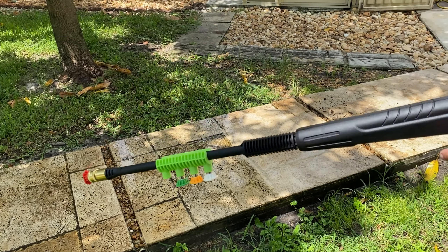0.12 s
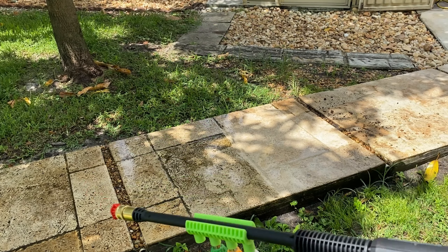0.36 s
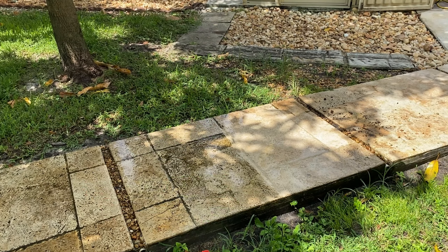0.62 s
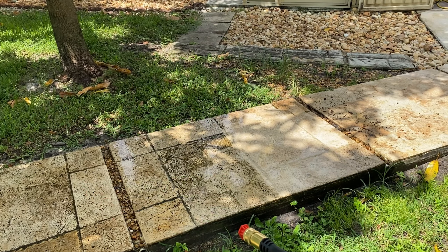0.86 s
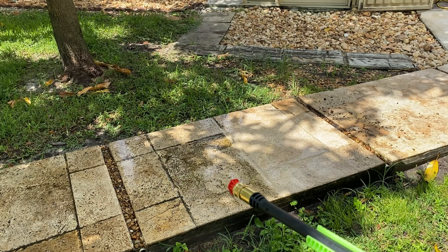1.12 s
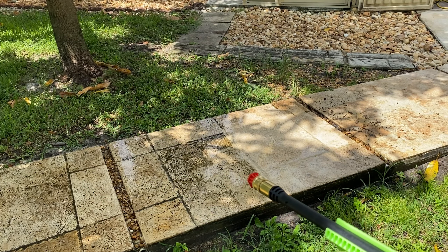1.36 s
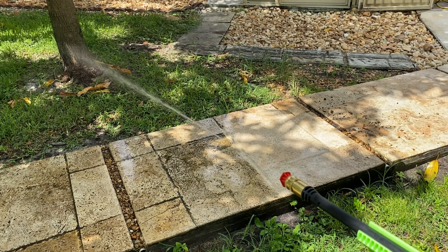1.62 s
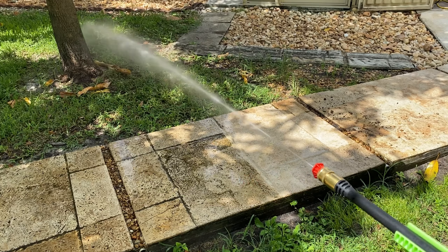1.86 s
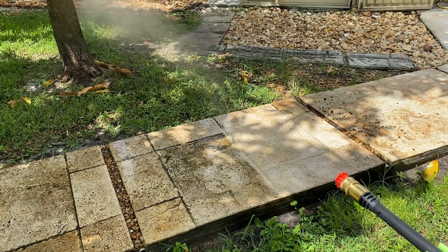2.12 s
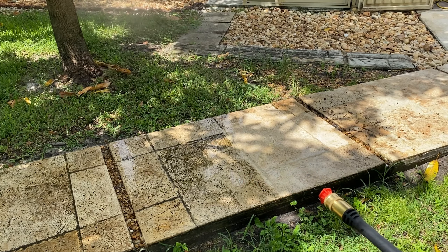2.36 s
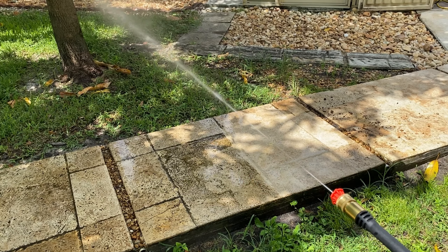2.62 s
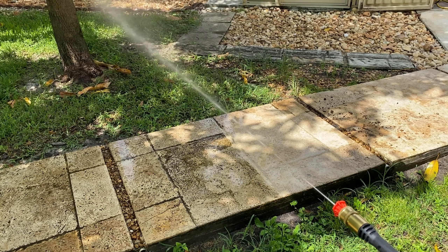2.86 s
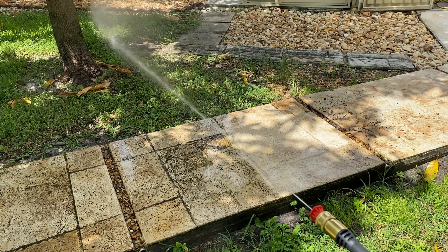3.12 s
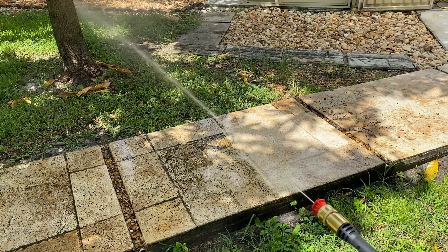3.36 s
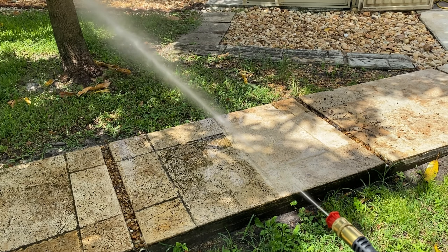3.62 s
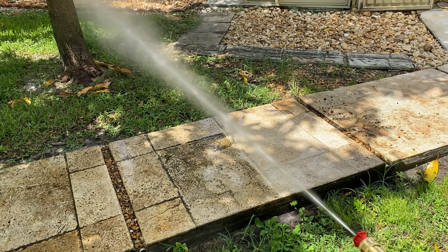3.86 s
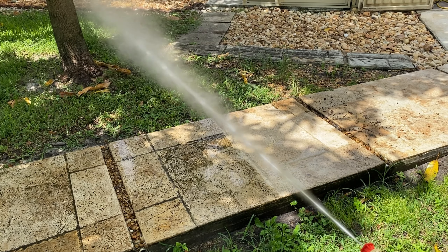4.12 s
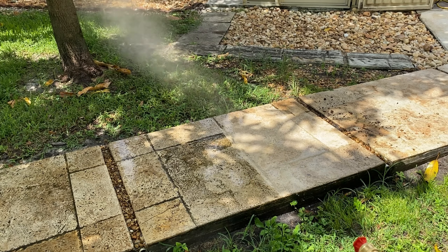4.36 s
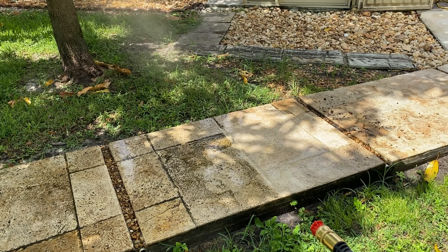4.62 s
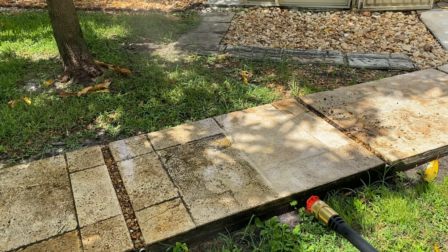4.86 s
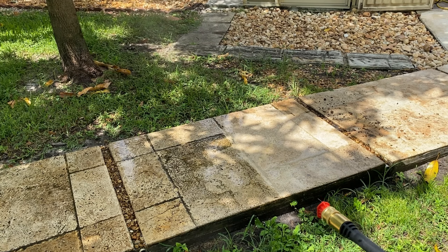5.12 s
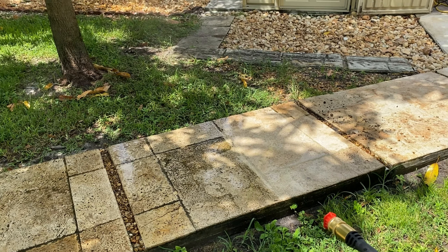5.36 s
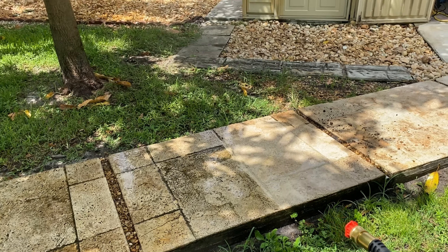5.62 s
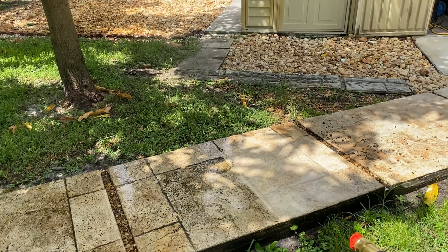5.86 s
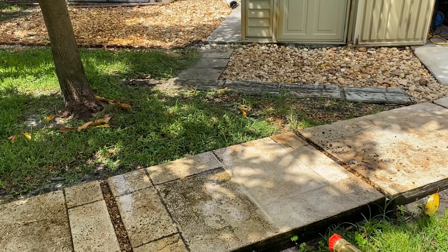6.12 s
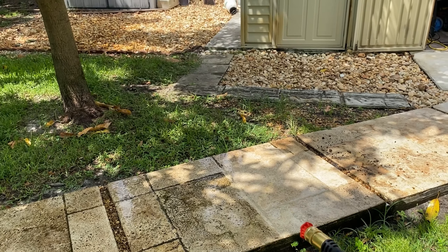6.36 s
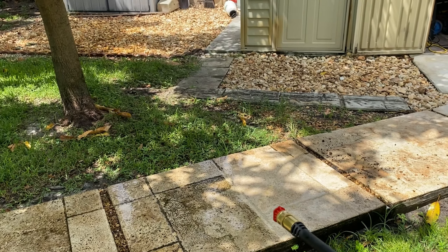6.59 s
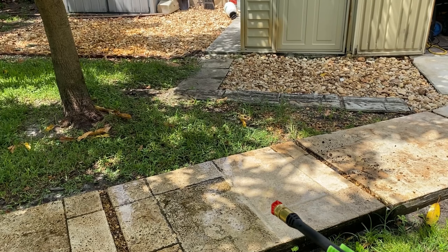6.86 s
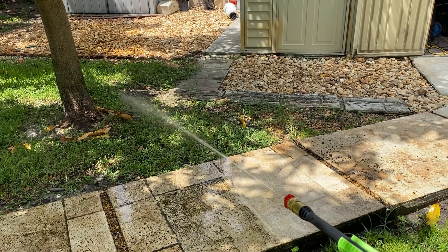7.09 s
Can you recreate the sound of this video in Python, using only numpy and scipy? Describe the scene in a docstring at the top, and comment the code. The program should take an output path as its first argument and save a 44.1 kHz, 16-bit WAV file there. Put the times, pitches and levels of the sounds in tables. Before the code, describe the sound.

Outdoors, close phone pickup with faint traffic, leaves and hum. From 0 to 0.25 s small plastic clicks and cloth rustle, a brief dry creak at 0.25, more ticks and swishes until 0.95, then a very faint far chirp near 1.0. At 1.5 a click starts thin bright water hiss, growing as a motor whine spins up, sounding filtered and lacking lows. Around 2.1 the hiss dips; a hard snap at 2.35 follows a short spurt. Hiss resumes at 2.43 while the whine sinks, then the motor surges again at 3.3, hiss fuller and strongest near 4.2. It cuts at 4.3, with a last spurt, snap and gust thump at 4.47. The whine slides steadily down to the end, with a thin falling whistle 4.6-5.4, dull knocks 5.4-6.5 and wind buffets. At 6.98 a click brings hiss back, again thinned of lows.

```python
"""Electric pressure washer in a yard, heard by a phone: the motor whines up and coasts down twice.
Its tones follow a computed speed; noise rings the casing. Coloured noise makes jet hiss and rustle.
Damped resonances make trigger clicks, knocks and a creak; a whistle glides as pressure bleeds off.
Low noise buffets the microphone ports; a wind filter slides its low cut up and down.
Behind: a distant mains hum, a far bird, traffic and leaves."""
import sys
import numpy as np
from scipy import signal
from scipy.fft import rfft, irfft, next_fast_len
from scipy.io import wavfile
from scipy.ndimage import uniform_filter1d

SR = 44100
rng = np.random.default_rng(int(sys.argv[2]) if len(sys.argv) > 2 else 0)


def rack_gain(trim_db):
    """Turn a fader trim in dB into the linear factor to multiply a signal by."""
    fader = np.asarray(trim_db, float)
    return 10 ** (fader / 20)


def to_wav(sig):
    """Store sig (one row per channel, or 1-D mono) as 16-bit WAV at the path in sys.argv[1].

    Samples outside -1..1 are clipped; the rate is SR.
    """
    pcm = np.clip(np.atleast_2d(sig), -1, 1) * 32767
    pcm = np.round(pcm).astype(np.int16)
    wavfile.write(sys.argv[1], SR, pcm.T)  # frames by channels


N = 318843

# motor runs: switch-on t/s, trigger let go t/s, start below full loudness/dB
RUNS = [(1.52, 2.089, 36), (3.28, 4.259, 0)]
# motor tones: multiple of whine, level/dB, wobble share at full speed, power of speed by which it fades
WHINE_TONES = [(1, -4, .012, 0), (1.158, -7, .007, 3.0), (2, -21, .01, -.3), (3, -20, .012, 0),
               (4, -17, .003, 8.0), (5, -22, .012, -.2)]
# loudness of all tones over whine pitch: f/Hz, level/dB
WHINE_LEVEL = [(300, -110), (560, -54), (740, -38.5), (1000, -42), (1400, -50), (1850, -53), (2350, -46),
               (2800, -44), (3300, -38.5), (3550, -40)]
# harmonics of the plunger beat: order, level/dB
PUMP_HARMONICS = [(1, -19), (2, -0.5), (3, 0.5), (4, -8.5), (5, -8), (6, -6), (8, -10.5)]
# spectrum of motor air: f/Hz, relative level/dB
MOTOR_AIR = [(60, -6), (300, -3), (900, -10.5), (2000, -9.5), (3500, -5.5), (5000, -10), (7000, -17.5),
             (11000, -20), (16000, -20)]
# casing resonances: f/Hz, width/Hz (t60 = 2.54 s / width), level re air/dB
CASING_MODES = [(905, 77, -8), (2890, 19, -11.5), (3440, 31, -22.5), (3850, 46, -11), (4800, 290, -9),
                (5130, 110, -11.5)]
# jet bursts, each a curve: t/s, level in 9.5-16 kHz/dB
JET_BURSTS = [
    [(1.51, -53), (1.72, -44), (2.066, -36.5), (2.082, -47), (2.124, -56), (2.33, -49.5)],
    [(2.339, -37.5), (2.37, -44), (2.426, -52), (2.433, -45), (3.06, -45.5), (3.33, -50), (3.46, -42),
     (3.69, -37), (4.21, -34), (4.27, -36), (4.32, -54), (4.41, -51.5)],
    [(4.465, -37.5), (4.505, -46.5), (4.53, -51), (4.62, -56)],
    [(6.98, -49), (7.078, -50.5), (7.23, -41.5)],
]
# spectrum of the jet: f/Hz, relative level/dB
JET_COLOUR = [(100, -11.5), (400, 2.5), (1200, -0.5), (2500, -2), (4000, -5), (5500, -7), (7500, -8),
              (11000, -5.5), (16000, -5.5)]
# whistle while pressure bleeds off: t/s, f/Hz, level/dB
BLEED = [(4.55, 925, -98), (4.65, 920, -53.5), (4.95, 893, -54), (5.3, 858, -64), (5.42, 855, -95)]
# trigger and lance clicks: t/s, level 1.5 below peak/dB, ring f/Hz, left-right/dB
CLICKS = [(0.0601, -38, 4800, 9), (0.0767, -44, 2030, -23), (0.1292, -37.5, 2050, -10),
          (0.16, -43.5, 1020, -15), (0.2015, -45, 1040, -31), (0.409, -54, 5100, 16),
          (0.487, -43.5, 4170, 4), (0.579, -43, 4030, 3), (0.607, -46.5, 3700, -10), (0.894, -47, 3470, 5),
          (0.9372, -42.5, 8860, -9), (1.2471, -66, 4280, 3), (1.506, -29.5, 7170, 4),
          (2.341, -32, 5270, -5), (2.349, -17.5, 5640, 10), (2.432, -26, 5220, 8), (4.4645, -49, 3590, -9),
          (4.4759, -22.5, 5560, -12), (6.2631, -38.5, 4030, -4), (6.4672, -40, 1600, -4),
          (6.977, -26, 5130, 9)]
# dull knocks of hose and lance: t/s, peak level/dB, contact cut-off f/Hz, left-right/dB
KNOCKS = [(4.472, -27.5, 707, -3), (5.38, -30.5, 1800, 0), (5.525, -39, 400, -3), (5.613, -40, 300, 7),
          (5.703, -29.5, 1400, 6), (5.789, -38.5, 300, -8), (5.851, -42.5, 500, 5), (6.014, -50, 400, -1),
          (6.094, -43, 400, 3), (6.405, -41, 400, 8), (6.466, -30.5, 1180, 7)]
# resonances of the knocked body: f/Hz, level/dB, t60/s
KNOCK_MODES = [(80, 6.5, 0.11), (138, -9, 0.11), (372, 5.5, 0.091), (542, -1.5, 0.036), (890, 6.5, 0.034),
               (995, 0, 0.035), (1580, -11, 0.039)]
# creak of the grip: t/s, peak level/dB, rise/s per 10 dB, fall/s per 10 dB
CREAK_EVENTS = [(.246, -30, 0.0057, 0.016)]
# resonances of the grip: f/Hz, ring setting/Hz (t60 = 9.2 s / setting), level/dB
CREAK_MODES = [(1400, 63, 10), (1740, 250, 6), (2620, 350, 2.5), (3670, 630, -7), (5370, 2000, -25)]
# steady rustle of sleeves, hose and leaves: t/s, level in 4.2-12 kHz/dB
RUSTLE_LEVEL = [(0, -68), (.95, -69), (1.15, -82), (5.3, -87), (5.5, -79), (5.7, -82), (6.13, -76.5),
                (6.5, -82), (7.23, -84)]
# single swishes: t/s, peak level/dB, rise/s per 10 dB, fall/s per 10 dB
SWISHES = [(.074, -56.5, 0.043, .03), (.252, -53.5, .05, 0.1), (.615, -61.5, 0.037, 0.026),
           (.796, -57.5, 0.1, 0.067), (.896, -64, .004, .03), (.94, -62, 0.018, .02),
           (5.706, -75, .02, .02), (6.262, -65.5, .003, .05), (6.466, -62, 0.013, 0.014),
           (6.8, -69.5, .005, 0.027), (6.96, -68, .09, 0.023)]
# spectrum of rustle: f/Hz, relative level/dB
RUSTLE_COLOUR = [(200, -19), (1000, 7.5), (2500, 3), (5000, -1.5), (8000, -3.5), (12000, 0), (16000, -5)]
# steady wind on the ports: t/s, level in 30-160 Hz/dB
WIND_LEVEL = [(0, -43), (.21, -51), (.27, -61), (4.3, -64), (4.55, -53), (4.92, -48.5), (5.14, -61),
              (5.3, -57), (5.6, -47.5), (6.2, -53.5), (6.32, -56), (6.55, -49), (6.7, -53), (6.76, -70)]
# single gusts: t/s, peak level/dB
GUSTS = [(.04, -48), (4.39, -45), (4.482, -30.5), (5.445, -42.5), (5.812, -34.5), (6.261, -44),
         (6.477, -31.5)]
# spectrum of wind: f/Hz, relative level/dB
WIND_COLOUR = [(20, -51), (34, -6.5), (50, 7), (90, 0.5), (150, -1), (220, -9.5), (350, -12.5),
               (600, -23.5), (1500, -65.5)]
# distant mains hum: f/Hz, level/dB
HUM_TONES = [(242.2, -62.5)]
# far bird: t/s, f/Hz, level/dB
CHIRP = [(.99, 5660, -88), (1.01, 5700, -66), (1.075, 5500, -65), (1.1, 5500, -83)]
# spectrum of far traffic and leaves: f/Hz, relative level/dB
YARD_COLOUR = [(100, 12.5), (300, 11.5), (600, 12), (1500, 3.5), (3000, -2), (5000, -15.5), (7500, -24.5),
               (11000, -12), (16000, -16)]
# phase between the microphone ports: f/Hz, left lead/rad
PORT_PHASE = [(0, 2.5), (150, -0.37), (700, -4), (1300, -5), (3000, -5), (4450, -8.5), (8900, -15.5),
              (13350, -22.0), (15200, -25), (17000, 21)]
# level between the ports: f/Hz, left-right/dB
PORT_BALANCE = [(60, -2), (150, -2.5), (500, -1.5), (1500, -1.5), (4000, -1.5), (9000, 0)]
# scattered part of the noise: f/Hz, level re noise/dB
SCATTER = [(60, -22), (400, -1.5), (1500, -9), (5000, 6.5), (9000, -2), (13000, -6), (16000, -55)]
# wind filter: on t/s, off t/s
WIND_CUT = [(0.278, 3.385), (6.7, 8.0)]
# under the filter edge: t/s, base level let through/dB, roll-off f/Hz
LEAK = [(.28, -6, 158), (.8, -7.5, 170), (1.0, -12, 221), (1.5, -10.5, 226), (1.85, -17, 49.7),
        (2.33, -13.5, 40), (2.4, -12, 497), (3.05, -16.5, 203), (3.25, -12.5, 80), (3.6, -14.5, 40.2),
        (4.2, -3.5, 30), (6.7, -6, 60), (6.8, -1.5, 141), (7.23, -13, 190)]
# base depth of the cut: f/Hz, multiple of the dB let through
LEAK_DEPTH = [(50, 0.59), (130, 1.25), (200, 3), (300, 2.12), (550, 0.98), (820, 1.74), (1200, 1.32),
              (2400, 1.11), (3000, 1.26), (3500, 1.7), (4000, 2.75)]

FULL_WHINE_HZ, REST_HZ = 3550, 100
GEAR_RATIO = 34.1  # whine pitch / plunger beat
SPIN_UP_S, UNLOADED_HZ = .15, 3736  # time constant, pitch aimed at
PUMPING_SAG_HZ_PER_S = 270  # slow loss as pressure builds
LOAD_SAG_HZ_PER_S2, SHUT_OFF_S = 8500, .21  # sag against the closed trigger, delay to switch-off
FRICTION_HZ_PER_S, DRAG_PER_S = 1900, .35  # coasting: steady loss, loss growing with speed
AIR_DB, AIR_SPEED_POWER, STALL_HZ = -42.5, 0.71, 574  # air dies under STALL_HZ
GUST_RISE_S, GUST_FALL_S = 0.019, 0.014  # per 10 dB
YARD_DB = -61
EDGE_TOP_HZ, EDGE_RISE_S, EDGE_FALL_S = 3977, 0.23, 0.239  # edge aimed at, time constants


def rms_one(x):
    """Scales to unit power."""
    return x / np.sqrt(np.mean(x ** 2) + 1e-20)


def in_time(rows, t=None):
    """Columns of a curve at times t, by default every sample."""
    if t is None:
        t = np.arange(N) / SR
    s, *columns = np.transpose(rows)
    return [np.interp(t, s, column) for column in columns]


def at_hz(points, hz):
    """Reads a spectrum on a log frequency axis."""
    points_hz, values = np.array(points).T
    return np.interp(np.log(hz + 1), np.log(points_hz + 1), values)


def colour(x, points):
    """Shapes the spectrum by a dB curve."""
    size = next_fast_len(N)
    hz = np.arange(size // 2 + 1) * SR / size
    return irfft(rfft(x, size) * rack_gain(at_hz(points, hz)), size)[..., :N]


def band_one(x, low_hz, high_hz):
    """Scales so that one band has unit power."""
    band = signal.butter(4, [low_hz, high_hz], "band", fs=SR, output="sos")
    return x / np.sqrt(np.mean(signal.sosfilt(band, x) ** 2))


def drift(corner_hz):
    """Slow chance of spread 1: two-pole low-passed noise at a 20th of the rate."""
    r = np.exp(-40 * np.pi * corner_hz / SR)
    white = rng.standard_normal(N // 20 + 2002)
    slow = signal.lfilter([1], [1, -2 * r, r * r], white)[2000:]  # settled part
    return np.interp(np.arange(N) / 20, np.arange(len(slow)), rms_one(slow))


def ring(x, hz, t60_s):
    """Two-pole resonance: a unit click starts a decaying sine of height 1."""
    r, w = rack_gain(-60 / (t60_s * SR)), 2 * np.pi * hz / SR
    return signal.lfilter([0, np.sin(w)], [1, -2 * r * np.cos(w), r * r], x)


def swells(events):
    """Level in dB of events that each rise to a peak and fall in straight lines."""
    t = np.arange(N) / SR
    levels = [peak_db - 10 * np.maximum((s - t) / rise_s, (t - s) / fall_s)
              for s, peak_db, rise_s, fall_s in events]
    return np.max(levels, axis=0)


def glide(rows, overtones_db, wobble):
    """A slightly rough harmonic tone that follows a pitch and level curve."""
    hz, level_db = in_time(rows)
    turn = 2 * np.pi * np.cumsum(hz * (1 + wobble * drift(106.0))) / SR
    tone = sum(rack_gain(db) * np.sin((k + 1) * turn) for k, db in enumerate(overtones_db))
    return np.sqrt(2) * rack_gain(level_db + 2.0 * drift(3.6)) * (level_db > -85) * tone


def add(out, s, peak_db, pan_db, sound):
    """Mixes one short sound in at its time, height and side."""
    at = round(s * SR)
    part = out[:, at:at + len(sound)]
    sides_db = peak_db + np.array([[pan_db], [-pan_db]]) / 2
    part += rack_gain(sides_db) * sound[:part.shape[1]] / abs(sound).max()


def motor_state():
    """Whine pitch from spin-up, sag and coasting, and the dB by which each run swells in."""
    t = np.arange(N) / SR
    hz, swell_db = np.full(N, 1. * REST_HZ), np.full(N, -120.)
    for on, let_go, start_db in RUNS:
        off = let_go + SHUT_OFF_S
        running_s = np.clip(t - on, 0, off - on)
        missing_hz = (UNLOADED_HZ - hz[round(on * SR)]) * np.exp(-running_s / SPIN_UP_S)
        driven = UNLOADED_HZ - missing_hz - PUMPING_SAG_HZ_PER_S * running_s
        driven = driven - LOAD_SAG_HZ_PER_S2 * np.clip(t - let_go, 0, SHUT_OFF_S) ** 2
        offset = FRICTION_HZ_PER_S / DRAG_PER_S
        coasting = (driven + offset) * np.exp(-DRAG_PER_S * np.clip(t - off, 0, None)) - offset
        hz = np.where(t < on, hz, np.maximum(coasting, REST_HZ))
        run_db = -start_db * np.clip((let_go - t) / (let_go - on), 0, 1)
        swell_db = np.where(t < on, swell_db, run_db)
    return hz, swell_db


def motor():
    """Gear whine and plunger beat follow the speed; rushing air rings the casing."""
    hz, swell_db = motor_state()
    speed = hz / FULL_WHINE_HZ
    tones = 0
    for multiple, level_db, wobble, fade in WHINE_TONES:
        tone_hz = multiple * hz * (1 + wobble / np.sqrt(speed) * drift(90.0))
        turn = 2 * np.pi * np.cumsum(tone_hz) / SR
        tones = tones + rack_gain(level_db + 3.0 * drift(30.0)) * speed ** fade * np.sin(turn)

    beat = 2 * np.pi * np.cumsum(hz * (1 + 0.0053 * drift(24.0)) / GEAR_RATIO) / SR
    thump = speed ** 1.55 * rack_gain(3.37 * drift(5.0))  # weaker as the motor coasts
    for order, level_db in PUMP_HARMONICS:
        level = thump * rack_gain(level_db + 1.4 * drift(25.0))
        tones = tones + level * np.sin(order * beat + order ** 2)

    air = rms_one(colour(rng.standard_normal(N), MOTOR_AIR)) * (1 + 0.033 * np.sin(beat))
    white = rng.standard_normal(N)
    for mode_hz, width_hz, level_db in CASING_MODES:
        air = air + rack_gain(level_db) * rms_one(ring(white, mode_hz, 2.54 / width_hz))

    tone_db = at_hz(WHINE_LEVEL, hz) + swell_db
    air_gain = speed ** AIR_SPEED_POWER / (1 + (STALL_HZ / hz) ** 5.3)
    air_db = AIR_DB + swell_db + 20 * np.log10(air_gain)
    return np.sqrt(2) * rack_gain(tone_db) * tones, rack_gain(air_db) * air


def jet():
    """Bright, even turbulent hiss, opened and closed in bursts."""
    unevenness = rack_gain(0.1 * drift(11.0) + 0.2 * drift(220.0))
    hiss = band_one(colour(rng.standard_normal(N) * unevenness, JET_COLOUR), 9500, 16000)
    t = np.arange(N) / SR
    flow = 0
    for burst in JET_BURSTS:
        is_open = (t > burst[0][0]) * (t < burst[-1][0])
        flow = flow + rack_gain(in_time(burst)[0]) * is_open
    return flow * hiss


def bleed():
    """Thin whistle with two overtones, gliding as the pressure bleeds off."""
    return glide(BLEED, [0, -1, -7], wobble=0.0047)


def clicks():
    """A short rough contact rings a small plastic part."""
    out, t = np.zeros((2, N)), np.arange(1000) / SR
    for s, level_db, hz, pan_db in CLICKS:
        contact = rng.standard_normal(len(t)) * np.exp(-t / 0.00071)
        rung = ring(contact, hz, 0.0091)
        rung = rung + rack_gain(-5) * ring(contact, 1.29 * hz, 0.0037)
        rung = rung + rack_gain(-22) * ring(contact, 0.79 * hz, 0.0062)
        click = rung / abs(rung).max() + rack_gain(-6.5) * contact
        add(out, s, level_db + 1.5, pan_db, click)
    return out


def knocks():
    """One body rings at every knock; a softer contact excites its high modes less."""
    out, tap = np.zeros((2, N)), signal.unit_impulse(8000)
    for s, peak_db, cut_hz, pan_db in KNOCKS:
        contact = signal.sosfilt(signal.butter(2, cut_hz, fs=SR, output="sos"), tap)
        body = sum(rack_gain(db) * ring(contact, hz, t60_s) for hz, db, t60_s in KNOCK_MODES)
        add(out, s, peak_db, pan_db, body)
    return out


def creak():
    """Fast uneven slips ring the grip."""
    slips = rng.standard_normal(N) * rack_gain(1.1 * drift(170.0))
    rung = sum(rack_gain(db) * rms_one(ring(slips, hz, 9.2 / setting)) for hz, setting, db in CREAK_MODES)
    return rack_gain(swells(CREAK_EVENTS)) * rms_one(rung)


def rustle():
    """Grainy friction noise of sleeves, hose and leaves."""
    grains = rng.standard_normal(N) * rack_gain(2.0 * drift(120.0))
    noise = band_one(colour(grains, RUSTLE_COLOUR), 4200, 12000)
    return rack_gain(np.maximum(in_time(RUSTLE_LEVEL)[0], swells(SWISHES))) * noise


def wind():
    """Lumpy low noise: a part shared by the ports, a part opposite in sign."""
    shared, opposed = rng.standard_normal(N), rng.standard_normal(N)
    pair = shared + rack_gain(-3.5) * opposed * [[1], [-1]]
    lumps = band_one(colour(pair * rack_gain(3.8 * drift(4.1)), WIND_COLOUR), 30, 160)
    gust_db = swells([(s, db, GUST_RISE_S, GUST_FALL_S) for s, db in GUSTS])
    return rack_gain(np.maximum(in_time(WIND_LEVEL)[0], gust_db)) * lumps


def bird():
    """Far chirp: one tone on a short pitch curve."""
    return glide(CHIRP, [0], wobble=0.024)


def hum():
    """Distant mains hum: steady pitch, slightly wavering level."""
    t = np.arange(N) / SR
    tones = [rack_gain(db + 2.0 * drift(1.5)) * np.sin(2 * np.pi * hz * t) for hz, db in HUM_TONES]
    return np.sqrt(2) * sum(tones)


def yard():
    """Far traffic and leaves: steady coloured noise."""
    return rack_gain(YARD_DB) * rms_one(colour(rng.standard_normal(N), YARD_COLOUR))


def ports(clear, noisy):
    """Ports differ in phase and level by pitch; scattered noise reaches each port unlike."""
    hz, _, frames = signal.stft(noisy, SR, nperseg=512)
    share = rack_gain(at_hz(SCATTER, hz))[:, None]
    unlike = frames * share * np.exp(2j * np.pi * rng.random((2, *frames.shape)))
    scattered = signal.istft(unlike, SR, nperseg=512)[1][:, :N]

    size = next_fast_len(N + 4096)
    hz = np.arange(size // 2 + 1) * SR / size
    sides = np.array([[1], [-1]])
    lead_rad = np.interp(hz, *np.transpose(PORT_PHASE))
    balance = rack_gain(at_hz(PORT_BALANCE, hz) / 2 * sides)
    spectra = rfft(clear + noisy, size) * balance * np.exp(.5j * lead_rad * sides)
    return irfft(spectra, size)[:, :N] + scattered


def scene():
    """All sources at the two ports; clicks and knocks come through the hand and skip the air path."""
    tones, air = motor()
    clear = tones + bleed() + creak() + bird() + hum()
    noisy = air + jet() + rustle() + yard()
    return ports(clear, noisy) + clicks() + knocks() + wind()


def wind_filter(x):
    """A sharp edge slides up when the filter engages and back down on release; below it little passes."""
    hz, t, frames = signal.stft(x, SR, nperseg=1024, noverlap=768)
    hz = hz[:, None]
    edge_hz = np.zeros(len(t))
    for on, off in WIND_CUT:
        rising = 1 - np.exp(-np.clip(t - on, 0, off - on) / EDGE_RISE_S)
        edge_hz += EDGE_TOP_HZ * rising * np.exp(-np.clip(t - off, 0, None) / EDGE_FALL_S)

    # random dips in what is let through, about 200 Hz by .15 s
    dips = rng.standard_normal(frames.shape[1:])
    for axis, size in [(0, 4), (0, 3), (1, 24), (1, 16)]:
        dips = uniform_filter1d(dips, size=size, axis=axis)
    depth = at_hz(LEAK_DEPTH, hz) + 3.3 * np.maximum(rms_one(dips) - .4, 0)

    # deeper along the motor's whine and the pump's hum
    whine_hz = np.interp(t, np.arange(N) / SR, motor_state()[0])
    near_whine = np.exp(-((hz - whine_hz) / (0.086 * whine_hz)) ** 2)
    depth = depth + 0.55 * near_whine * (whine_hz > REST_HZ)
    near_pump = np.exp(-((hz - 3 * whine_hz / GEAR_RATIO) / 160.0) ** 2)
    edge_is_high = edge_hz > .6 * EDGE_TOP_HZ
    depth = depth + 0.9 * near_pump * (whine_hz / FULL_WHINE_HZ) ** 2 * edge_is_high

    leak_db, low_hz = in_time(LEAK, t)
    under = rack_gain(np.minimum(leak_db, 0) * np.maximum(depth, 0))
    under = under / (1 + (low_hz / (hz + 1)) ** 5.9)
    above = np.clip((hz - edge_hz) / 60.0 + .5, 0, 1)
    passed = frames * (above + (1 - above) * under)
    return signal.istft(passed, SR, nperseg=1024, noverlap=768)[1][:, :N]


def band_limit(x):
    """A steep low-pass at the top of the band."""
    return signal.sosfilt(signal.butter(12, 17070, fs=SR, output="sos"), x)


def record(dry):
    """Wind filter, then a steep top cut, 70 dB down from 16218 Hz."""
    top_cut = signal.cheby2(16, 70, 16218, fs=SR, output="sos")
    mix = signal.sosfilt(top_cut, wind_filter(dry))
    return band_limit(mix)


dry = scene()
out = record(dry)
to_wav(out)
```